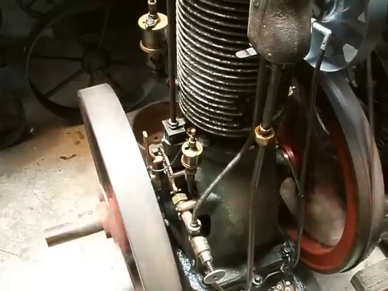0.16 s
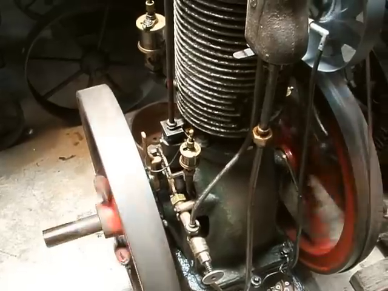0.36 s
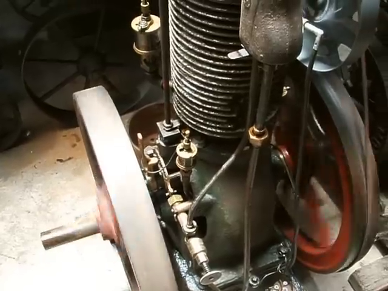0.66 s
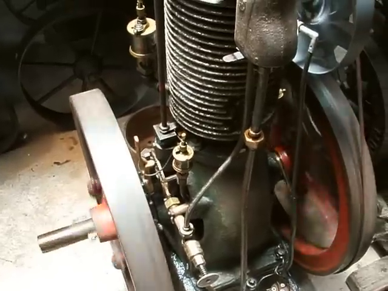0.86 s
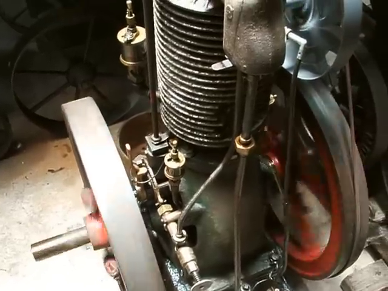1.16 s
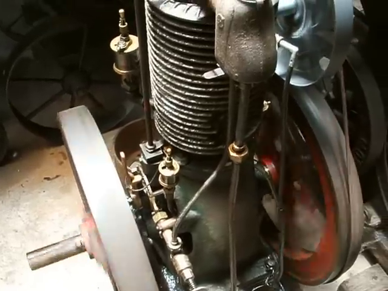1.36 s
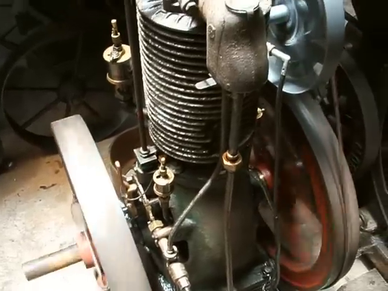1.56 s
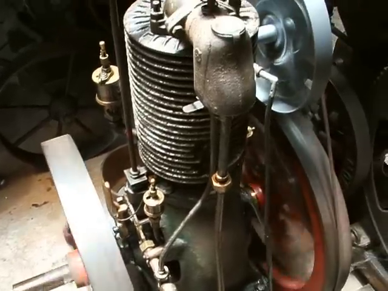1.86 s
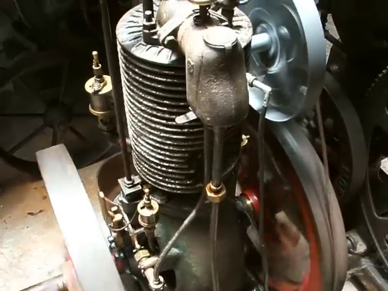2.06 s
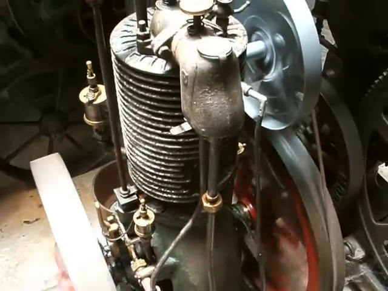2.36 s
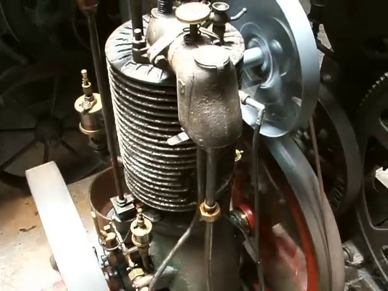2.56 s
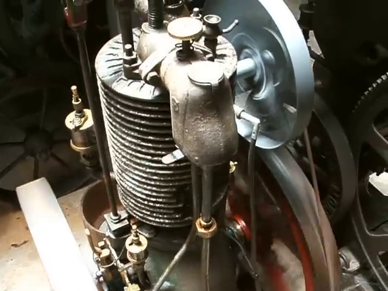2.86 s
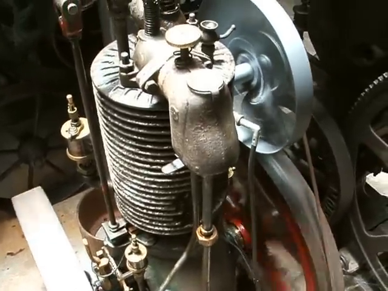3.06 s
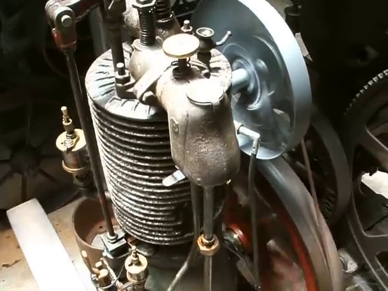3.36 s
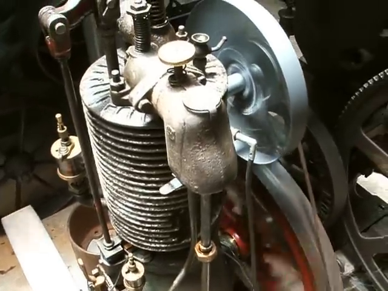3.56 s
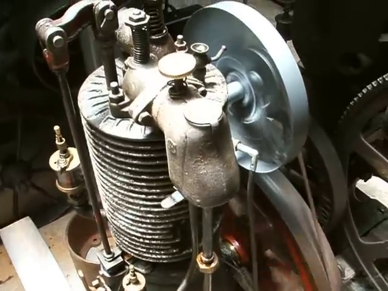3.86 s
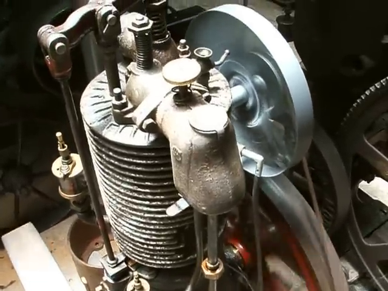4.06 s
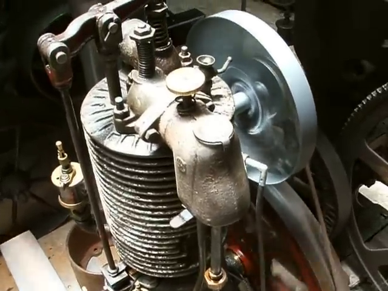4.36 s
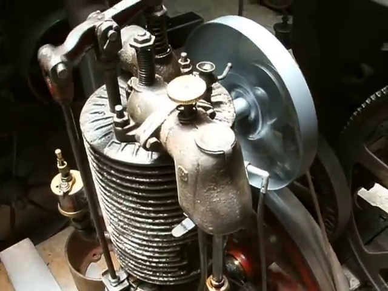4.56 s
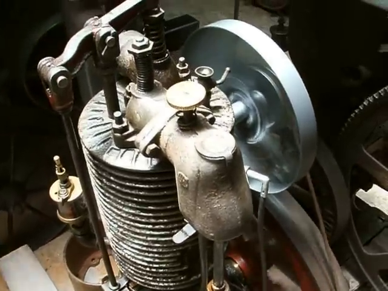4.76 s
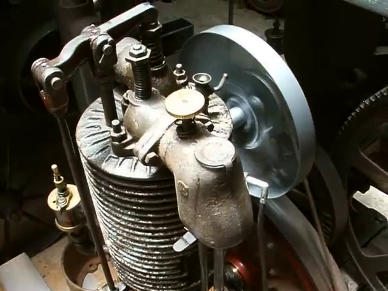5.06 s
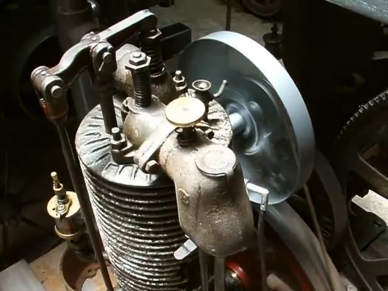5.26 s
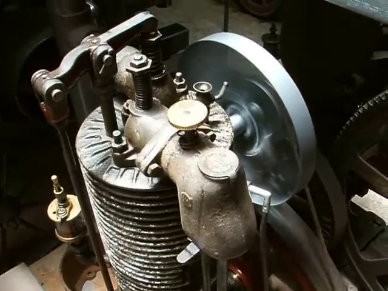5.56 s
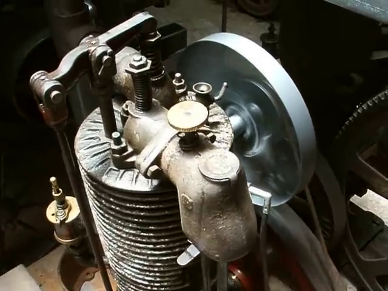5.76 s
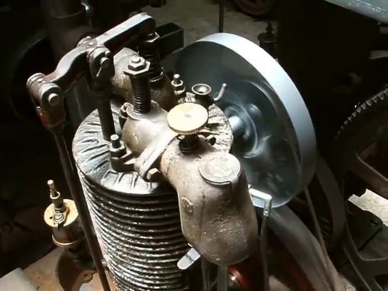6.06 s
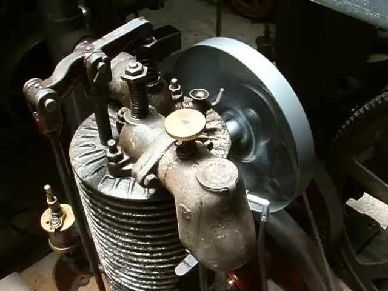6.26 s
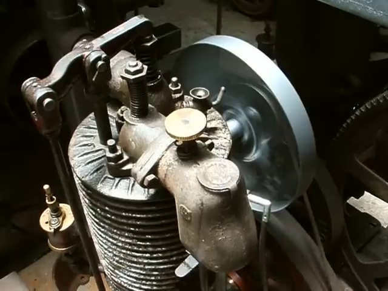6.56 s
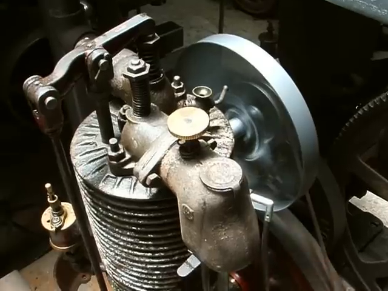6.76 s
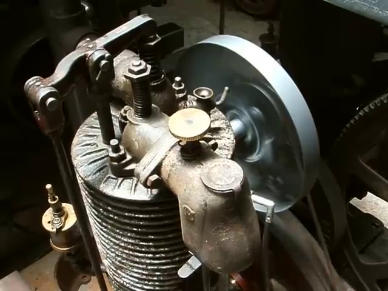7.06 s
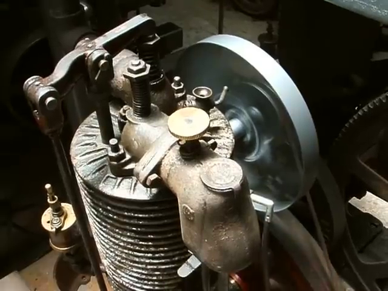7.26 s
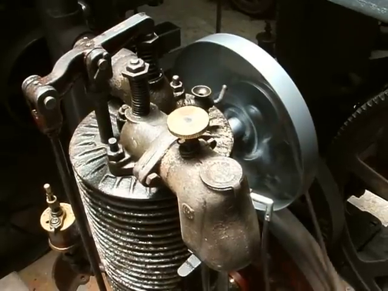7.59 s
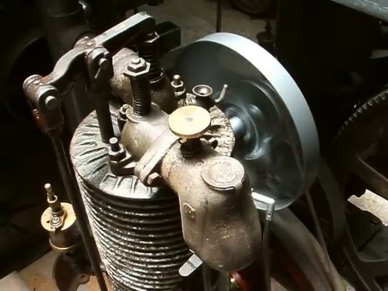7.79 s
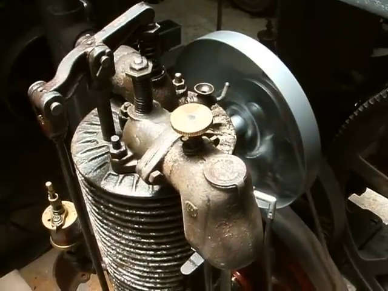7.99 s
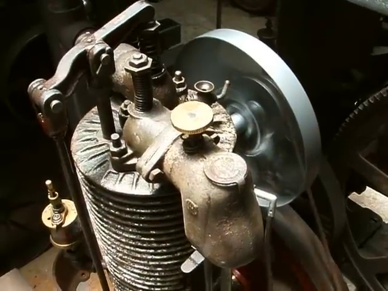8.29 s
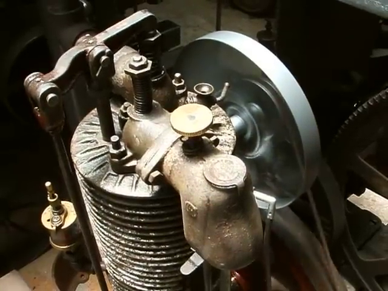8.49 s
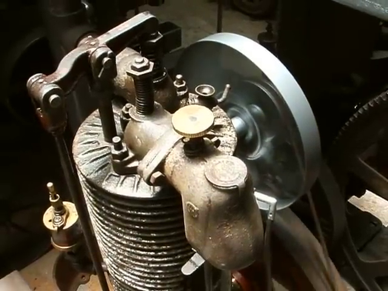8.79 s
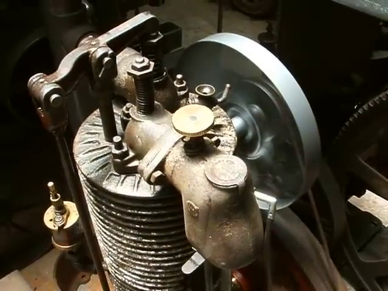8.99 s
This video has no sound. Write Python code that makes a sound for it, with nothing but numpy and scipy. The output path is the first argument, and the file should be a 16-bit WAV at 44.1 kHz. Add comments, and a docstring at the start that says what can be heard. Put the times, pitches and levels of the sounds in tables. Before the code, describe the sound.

An old single-cylinder engine coasts in a shed, ticking and clacking twice a second over whirring gears, with a sharp pop every three and a half seconds.

```python
"""Coasting single-cylinder engine

An old engine coasts in a shed: over a whir of gears and a breath of air, the latch ticks and the rocker
clacks on six cam turns of seven. Showers of clicks excite damped resonances of frame, base and spring.
Once in seven turns the intake valve chatters, the charge fires and the exhaust pops: a steep pressure
flip and a jet of gas. Running noise and linkage sink after each firing and swell back while coasting."""
import sys
import numpy as np
from scipy import signal
from scipy.fft import rfft, irfft, next_fast_len
from scipy.io import wavfile

SR = 44100
rng = np.random.default_rng(int(sys.argv[2]) if len(sys.argv) > 2 else 0)


def boost(x):
    """Linear amplitude factor 10**(x/20) for a level x in decibels (scalar or array-like)."""
    u = np.asarray(x, float) / 20
    return 10 ** u


def store_pcm(level_fs):
    """Save levels as 16-bit WAV."""
    pcm = np.round(np.clip(level_fs, -1, 1) * 32767).astype(np.int16)
    wavfile.write(sys.argv[1], SR, np.atleast_2d(pcm).T)


N = 402633  # length [samples]

# latch contacts: (time [s], treble level re climb [dB], middle re treble [dB])
LATCH = [(0.0217, 14, -4), (0.5356, 15, -6), (1.069, 11, 0), (2.0537, 12, -1), (2.5153, 14, -2),
         (2.9912, 16, -0.5), (3.4828, 15.5, -6), (3.989, 11, 3.5), (4.513, 13, -1.5), (5.4769, 9, 2.5),
         (5.9395, 10, 2), (6.4064, 12.5, 1), (6.892, 14.5, -3), (7.3913, 10.5, 2), (7.906, 11, 3),
         (8.859, 10, 3)]
# firings: (exhaust opening [s], pop level [dB], burning hiss level [dB], depth factor of the whir's dip)
FIRINGS = [(1.5804, -8, -25.5, .95), (5.0124, -6, -28.5, 0.96), (8.3986, -8, -33, 1.24)]
# modes of the iron frame and linkage: (frequency [Hz], level [dB], t60 [s])
FRAME = [(917, -5, .1), (1155, -2, .07), (1250, -2, .06), (1466, -6, .06), (1690, -5, .05), (1810, -3, .05),
         (2052, -1, .06), (2255, -2, .07), (2466, -6, .05), (2682, -5, .07), (2875, -4, .1), (3123, -5, .1),
         (3530, -8, .06), (3867, -8, .08)]
# modes of the valve spring: (frequency [Hz], level [dB], t60 [s])
SPRING = [(6228, 0, .04), (6370, 1, .05)]
# modes of the cast base: (frequency [Hz], level [dB], t60 [s])
BASE = [(320, 0, .14), (368, -3, .1), (578, -6, .08)]


def rms_one(x):
    """Normalisation: the mean power becomes 1."""
    return x / np.sqrt(np.mean(x ** 2) + 1e-20)


def band(x, low_hz, high_hz):
    """Band limiting by a Butterworth band-pass."""
    return signal.sosfilt(signal.butter(2, [low_hz, high_hz], "band", fs=SR, output="sos"), x)


def drift(corner_hz):
    """Random modulation: white noise through two equal real poles, at a 20th of the sample rate; rms 1."""
    pole = np.exp(-40 * np.pi * corner_hz / SR)
    white = rng.standard_normal(N // 20 + 2002)
    slow = signal.lfilter([1], [1, -2 * pole, pole * pole], white)[2000:]
    return np.interp(np.arange(N) / 20, np.arange(len(slow)), rms_one(slow))


def ring(clicks, modes):
    """Modal synthesis: every click sets every damped resonance ringing."""
    out = 0
    for k, (hz, db, t60_s) in enumerate(modes):
        radius = boost(-60 / (t60_s * SR))
        w = 2 * np.pi * hz / SR
        poles = [1, -2 * radius * np.cos(w), radius * radius]
        mode = signal.lfilter([0, boost(db) * np.sin(w)], poles, clicks + 1e-18)
        out = out + (-1) ** k * mode
    return out


def grains(per_s, spread_db):
    """Shot noise: random clicks of uneven size and sign, rms 1."""
    size_db = spread_db * np.minimum(rng.exponential(1, N), 4)
    sizes = boost(size_db) * rng.choice([-1, 1], N)
    return rms_one(sizes * (rng.random(N) < per_s / SR))


def coloured(spectrum, patchy_db):
    """Subtractive synthesis: noise shaped to a spectrum, each half octave flickering on its own; rms 1."""
    hz, db = np.transpose(spectrum)
    white = rng.standard_normal((2, N))
    edges = hz[0] * 2 ** np.arange(0, np.log2(hz[-1] / hz[0]) + .5, .5)
    out = 0
    for k, (low, high) in enumerate(zip(edges, edges[1:])):
        level_db = np.interp(np.log(low * high) / 2, np.log(hz), db)
        gain = boost(level_db + patchy_db * drift(29.4))
        out = out + gain * band(white[k % 2], low, high)  # neighbours draw on different noise
    return rms_one(out)


def marks(times, levels_db):
    """Impulses: single clicks at the given times."""
    out = np.zeros(N)
    out[np.round(np.asarray(times) * SR).astype(int)] = boost(levels_db)
    return out


def swell(times, levels_db, rise_s, fall_s):
    """Exponential rise and decay: an envelope of height 1, placed at each time with its level."""
    t = np.arange(int(.4 * SR)) / SR
    shape = (1 - np.exp(-t / rise_s)) * np.exp(-t / fall_s)
    return signal.fftconvolve(marks(times, levels_db), shape / shape.max())[:N]


def climb(t):
    """Level in dB: a steady rise since the last firing, bending over softly at a ceiling."""
    # rises: (firing [s], level the line starts from [dB])
    sinks = [(-1.81, -47), (1.5826, -52.5), (5, -52), (8.3986, -53.5)]
    db_per_s, ceiling_db, knee_db = 8.0, -29, 2.5
    s, start_db = np.transpose(sinks)
    last = np.searchsorted(s, t) - 1
    line_db = start_db[last] + db_per_s * (t - s[last])
    return -knee_db * np.logaddexp(-line_db / knee_db, -ceiling_db / knee_db)


def running_levels(t):
    """Level modulation in dB of whir and hiss: the climb plus a level course around every firing."""
    # courses around a firing: (time from the pop [s], whir shift [dB], hiss shift [dB])
    before_pop = [(-.46, 0.5, -1), (-.40, -1, -5.5), (-.31, 0, 0), (-.26, -11.5, 1.5), (-.17, -12.5, -4),
                  (-.12, -11.5, -9), (-.06, -7.5, -5), (-.005, -6, -4)]
    after_pop = [(.005, 16.5, 9), (.06, 7, 12.5), (.12, 3.5, 7.5), (.2, 1, 2), (.3, -2.5, 1.5),
                 (.42, -1, 1.5)]
    hiss_base_db, hiss_follows = -20.5, 0.74  # the hiss swings less than the whir
    lag, whir_shift, hiss_shift = np.transpose(before_pop + after_pop)
    whir_db, hiss_db = 0, 0
    for s, _, _, depth in FIRINGS:
        deepened = whir_shift * np.where(lag < 0, depth, 1)
        whir_db = whir_db + np.interp(t - s, lag, deepened, 0, 0)
        hiss_db = hiss_db + np.interp(t - s, lag, hiss_shift, 0, 0)
    return climb(t) + whir_db, hiss_base_db + hiss_follows * climb(t) + hiss_db


def struck(rows, colour):
    """Impact levels riding on the climb, with base and spring shares that scatter from blow to blow."""
    s, db, middle_db = np.transpose(rows)
    scatter_db = 0.5 * rng.standard_normal((len(s), 2))
    bass_db, ring_db = (np.array(colour) + scatter_db).T - db
    return s, db + climb(s), middle_db, bass_db, ring_db


def contacts(s, db, middle_db, ring_db, crack_s, shower_s, ring_lag_s, iron_db):
    """Impact of loose parts: a shower of clicks excites frame and spring; crack_s, shower_s: rise, fall."""
    crack = band(grains(7800, 4.4) * swell(s, db - 0.5, *crack_s), 4320, 7620)
    # the heavy parts follow the first touch
    shower = grains(6000, 2.5) * swell(s + 0.0021, db + middle_db, *shower_s)
    iron = band(ring(shower, FRAME), 1600, 4200)
    middle = band(shower, 1207, 3290) + boost(iron_db) * iron
    flick = marks(s + ring_lag_s, db + ring_db - 0.5) + boost(-37.5) * crack
    return crack + middle + ring(flick, SPRING)


def thuds(s, db, lag_s, length_s):
    """Structure-borne sound: a jolt and a burst of noise excite the modes of the cast base."""
    push = rng.standard_normal(N) * swell(s + lag_s, db, .0005, length_s)
    jolt = marks(s + lag_s, db - 8) + boost(-40) * push
    return band(ring(jolt, BASE) + boost(4) * band(push, 210, 600), 200, 870)


def shed(x):
    """Reverberation: eight feedback delays, duller on every round."""
    t60_s, wall_cut_hz = 0.49, 3240
    bass_cut_hz = 300  # thin walls let the bass out
    size = next_fast_len(N + SR)
    hz = np.arange(size // 2 + 1) * SR / size
    answer = 0
    for k, lag_s in enumerate(rng.uniform(.008, .03, 8)):
        walls = boost(-60 * lag_s / t60_s) / (1 + 1j * hz / wall_cut_hz) ** 0.56
        loop = walls * np.exp(-2j * np.pi * hz * lag_s)
        answer = answer + (-1) ** k * loop / (1 - loop)  # geometric series of rounds
    answer = answer * hz / np.hypot(hz, bass_cut_hz)
    return irfft(rfft(x, size) * answer, size)[:N]


def whir():
    """Periodic modulation by the cam: gear teeth rattle the frame, air breathes through the open valve."""
    # whir spectrum: (frequency [Hz], spectral density [dB])
    whir_colour = [(18, -69), (30, -40), (146, -1.5), (193, -1.5), (330, 5), (475, 2.5), (563, 6), (828, 3),
                   (1240, 4.5), (2120, 4), (5000, -15.5), (6500, -43), (11000, -120)]
    # air hiss spectrum: (frequency [Hz], spectral density [dB])
    hiss_colour = [(1760, -19.5), (3000, -6.5), (4120, -8.5), (5740, 0), (6430, -18), (7990, -14.5),
                   (9000, -44), (11700, -84), (19800, -120)]
    # shifts through one cam turn: (share of turn [1], whir [dB], rumble [dB], hiss [dB], spring [dB])
    cam = [(0, 2, 5.5, -0.5, 4), (.1, -0.5, -2, -1, 2), (.22, 0, 5.5, 3, -5), (.36, 1, 2.5, 0, -5),
           (.44, -2, -.5, .5, -1.5), (.55, -3, -0.5, -5, -9), (.68, -.5, -.5, -1, -9),
           (.8, 0.7, -1.5, -1, 0), (.87, .5, 1, -3.5, -9), (.93, -.5, -3.5, 3.5, -11),
           (1.0, -3.2, 0, -3.5, 2)]
    t = np.arange(N) / SR
    whir_db, hiss_db = running_levels(t)
    # a turn runs from each latch tick or pop to the next
    starts = np.sort([row[0] for row in LATCH + FIRINGS])
    turn = np.interp(t, np.append(starts, starts[-1] + 0.44), np.arange(len(starts) + 1)) % 1
    share, *columns = np.transpose(cam)
    cam_whir, cam_rumble, cam_hiss, cam_spring = (np.interp(turn, share, c) for c in columns)

    teeth = grains(2500, 3.6) * boost(1.1 * drift(17))
    rattle = rms_one(ring(teeth, BASE[1:] + FRAME))
    gears = rms_one(coloured(whir_colour, patchy_db=2.0) + boost(-4.5) * rattle)
    gears = signal.sosfilt(signal.butter(2, 90, "high", fs=SR, output="sos"), gears)
    rumble = signal.sosfilt(signal.butter(2, 700, fs=SR, output="sos"), gears)
    out = boost(whir_db + cam_whir) * (gears - rumble) + boost(whir_db + cam_rumble) * rumble
    out = out + boost(hiss_db + cam_hiss) * coloured(hiss_colour, patchy_db=2.0)
    return out + boost(hiss_db + cam_spring - 8.5) * rms_one(ring(teeth, SPRING))


def burn():
    """Turbulent leakage: a dull knock in the base, and gas hisses past the rings and dies away."""
    lead_s, knock_db = .097, 2  # burning starts before the pop; knock re hiss
    s, _, hiss_db, _ = np.transpose(FIRINGS)
    s = s - lead_s
    gas = rng.standard_normal(N) * swell(s, hiss_db, 0.019, 0.037)
    hiss = band(band(gas, 4200, 7900), 5000, 8300) + boost(-8) * band(gas, 900, 3200)
    return hiss + thuds(s, hiss_db + knock_db, lag_s=-0.0012, length_s=0.045)


def intake():
    """Air-column resonance: valve snaps puff the intake air, and the first draw booms in the pipe."""
    # snaps, four to a firing, the first a rocker bounce: (time [s], treble level [dB], air puff level [dB])
    snap_rows = [(1.193, -15.5, -17), (1.2372, -10.5, -17.5), (1.2704, -13.5, -17.5), (1.3048, -15.5, -20),
                 (4.635, -14.5, -19), (4.6775, -10, -15.5), (4.7123, -16.5, -19), (4.7439, -16, -22.5),
                 (8.0274, -23, -38), (8.0683, -12.5, -22), (8.1011, -15, -21.5), (8.136, -17, -24.5)]
    # modes of the intake air column: (frequency [Hz], level [dB], t60 [s])
    port = [(350, 0, .022)]
    # modes of the intake pipe and cylinder: (frequency [Hz], level [dB], t60 [s])
    pipe = [(135, -6, 0.13), (65, -3.5, 0.085)]
    # modes of the valve seat: (frequency [Hz], level [dB], t60 [s])
    seat_modes = [(4820, 0, .03), (5580, -6, .03), (7570, -6, .04), (7750, -4, .045), (8250, -9, .04)]
    # the first snap is the rocker's bounce ringing the spring, the others are the valve fluttering: # (middle
    # re treble [dB], spring ring re treble [dB], puff lag [s])
    first_snap, flutter = (-6.5, -.5, 0.02), (-8, -15, 0.00255)
    gulp_lag_s, gulp_db = 0.0208, -9.5  # first draw after the first snap; re the loudest puff

    s, db, puff_db = np.transpose(snap_rows)
    firings = len(FIRINGS)
    middle_db, ring_db, lag_s = np.transpose([first_snap, flutter, flutter, flutter] * firings)
    snaps = contacts(s, db - 2, middle_db, ring_db, crack_s=(.0007, .009), shower_s=(.003, .011),
                     ring_lag_s=.002, iron_db=-42)
    seat = boost(-27.5) * ring(grains(4400, 1.8) * swell(s, db, 0.00015, 0.0014), seat_modes)
    puffs = band(ring(marks(s + lag_s, puff_db), port), 140, 640) * boost(2.5)
    first_times = s.reshape(firings, -1)[:, 0]
    loudest_db = puff_db.reshape(firings, -1).max(axis=1)
    gulps = ring(marks(first_times + gulp_lag_s, loudest_db + gulp_db), pipe)
    return snaps + seat + puffs + band(gulps, 40, 200)


def linkage():
    """Repeated impact: latch ticks and rocker clacks, each clack settling in two small bounces."""
    # rocker contacts: (time [s], treble level re climb [dB], middle re treble [dB])
    rocker = [(0.099, 17.7, 5), (0.6187, 14.2, 4.5), (1.1522, 12.2, 10.5), (2.1235, 8.4, 8.5),
              (2.591, 11.8, 7.5), (3.067, 15.4, 4.5), (3.562, 17.3, 5.5), (4.069, 19.9, 1),
              (4.5945, 16.4, 6), (5.5541, 10.5, 4.5), (6.011, 13, 5.5), (6.4842, 13.2, 7), (6.969, 16.3, 6),
              (7.4699, 16.1, 6), (7.9877, 13.9, 8), (8.0072, 17.7, -3), (8.934, 12, 5)]
    # the rocker settles: (time after the clack [s], level re clack [dB])
    bounces = [(0.037, -7.5), (0.101, -19)]
    # shares every contact shakes: (cast base re climb [dB], spring ring re climb [dB])
    latch_colour, rocker_colour = (10.4, 7), (5, 10.5)

    s, db, middle_db, bass_db, ring_db = struck(LATCH, latch_colour)
    out = contacts(s, db, middle_db, ring_db, crack_s=(.0007, .007), shower_s=(.0015, .009),
                   ring_lag_s=0.0079, iron_db=-51.5)
    out = out + thuds(s, db + bass_db, lag_s=0.00902, length_s=0.039)

    s, db, middle_db, bass_db, ring_db = struck(rocker, rocker_colour)
    out = out + contacts(s, db, middle_db, ring_db, crack_s=(.002, .009), shower_s=(.008, .011),
                         ring_lag_s=0.0093, iron_db=-40.5)
    settle = sum(swell(s + lag_s, db + middle_db + less_db, 0.00088, 0.0069) for lag_s, less_db in bounces)
    out = out + band(grains(3000, 2.8) * settle, 900, 3300)
    return out + thuds(s, db + bass_db, lag_s=0.0052, length_s=0.023)


def exhaust():
    """Blow-down: pressure climbs, flips steeply to suction and settles; a jet of burnt gas shuts off."""
    jet_db = -4  # re pop
    s, db, *_ = np.transpose(FIRINGS)
    t = np.arange(-200, 400) / SR
    wave = -np.exp(-np.abs(t) / .00048) * np.tanh(t / .00035)
    wave = wave * np.where(t < 0, 1.5, 1)  # the pressure side is the stronger
    pop = signal.fftconvolve(marks(s, db + 3.5), wave)[200:N + 200]
    pop = signal.sosfilt(signal.butter(2, 140, "high", fs=SR, output="sos"), pop)
    pop = pop + boost(-20.0) * np.roll(pop, round(0.00345 * SR))  # bounce off the floor

    t = np.arange(int(.06 * SR)) / SR
    shut = 1 / (1 + np.exp((t - .021) / .002))
    flow = np.tanh(t / 0.00075) * np.exp(-t / 0.017) * shut
    gas = rng.standard_normal(N) * signal.fftconvolve(marks(s - .002, db + jet_db), flow)[:N]
    rattle = grains(2200, 2.8) * swell(s + .009, db - 11, 0.0058, 0.0067)
    return pop, band(gas, 4120, 8300) + band(rattle, 1330, 2560)


def scene():
    """Superposition: direct sound of all sources, with the shed's answer to the blows and the exhaust."""
    pop, jet = exhaust()
    blows = linkage() + intake() + burn()
    reverberation = shed(blows + boost(-12.0) * pop + boost(-4.5) * jet)
    return (blows + pop + jet + boost(-14.5) * reverberation + whir())[None]


def low_pass(x):
    """Removes everything above the highest recorded frequency."""
    return signal.sosfilt(signal.butter(12, 9610, fs=SR, output="sos"), x)


def record(dry):
    """Microphone chain: additive faint self-noise, a steep low-pass and a slight constant offset."""
    noise_db, low_noise_db, cutoff_hz, offset = -55.5, -75, 8203, 0.0054
    white = rng.standard_normal((2, N))
    low_noise = rms_one(band(white[1], 12, 90))
    x = dry + boost(noise_db) * white[0] + boost(low_noise_db) * low_noise
    x = signal.sosfilt(signal.butter(28, cutoff_hz, fs=SR, output="sos"), x) + offset
    return low_pass(x)


dry = scene()
out = record(dry)
store_pcm(out)
```